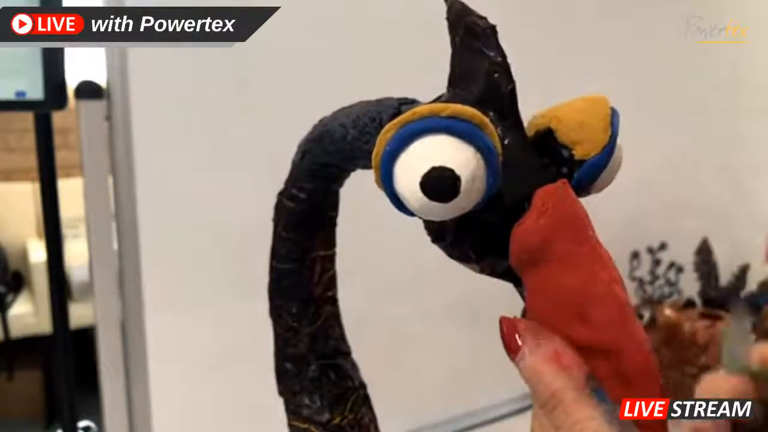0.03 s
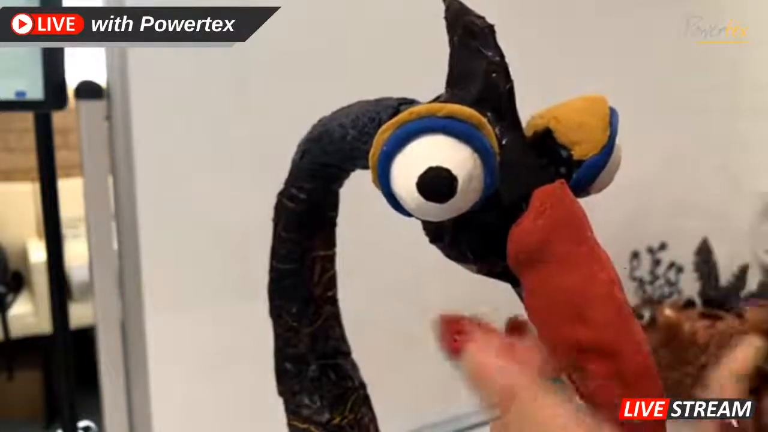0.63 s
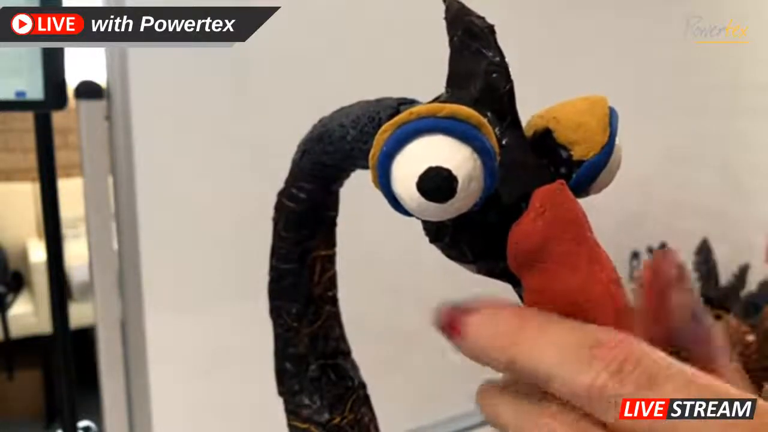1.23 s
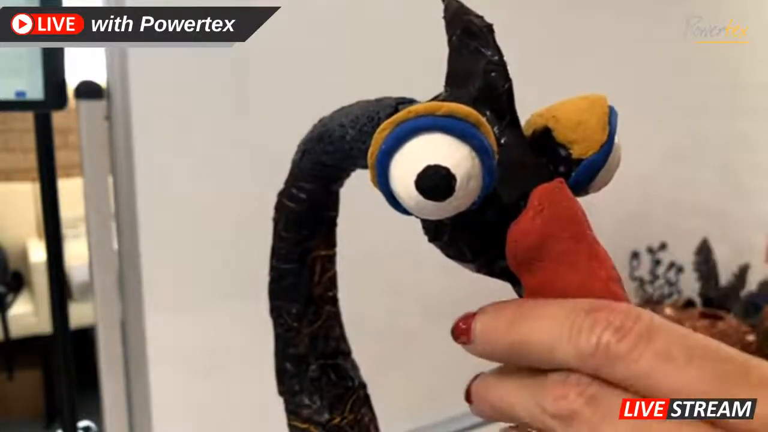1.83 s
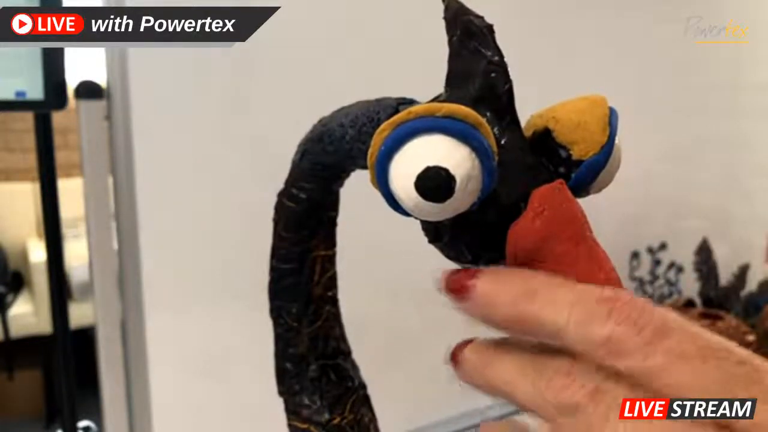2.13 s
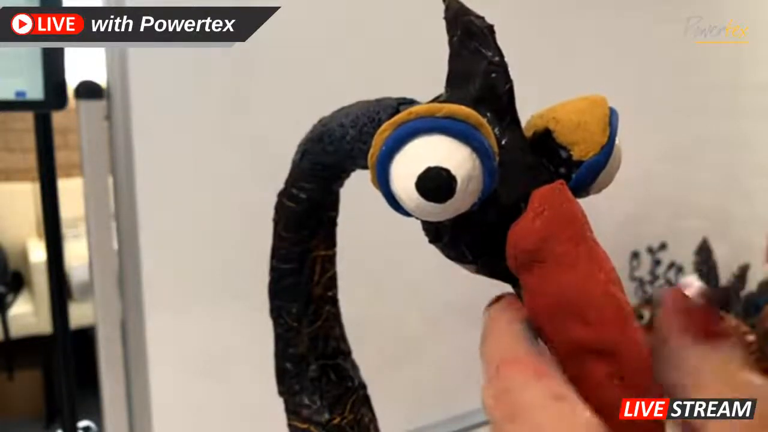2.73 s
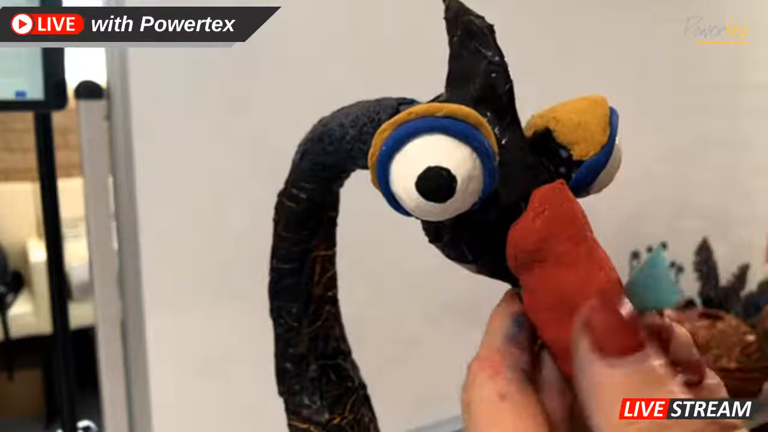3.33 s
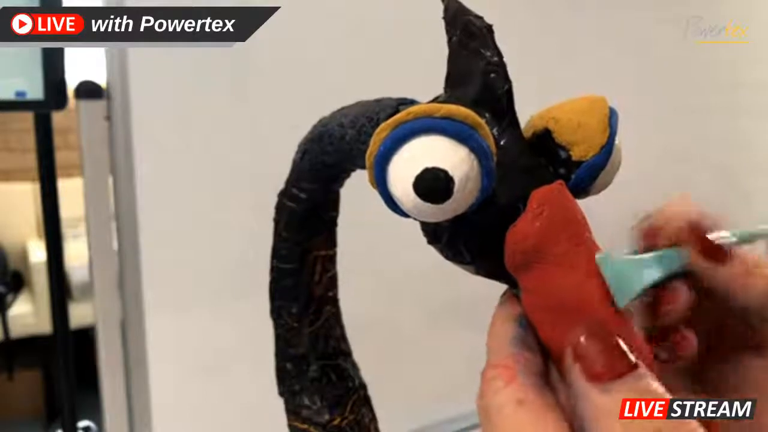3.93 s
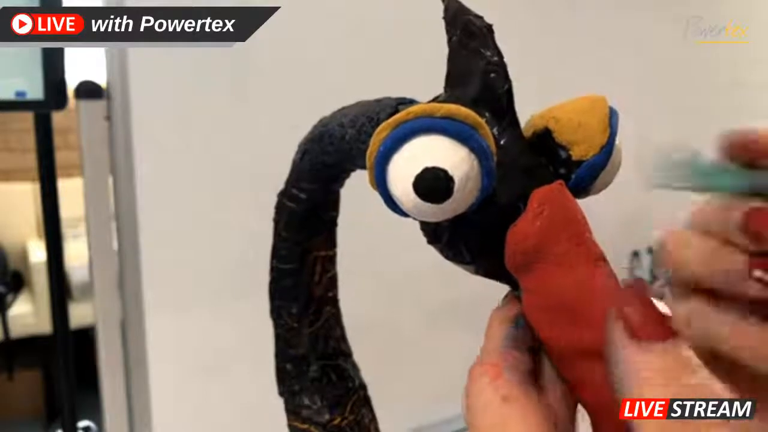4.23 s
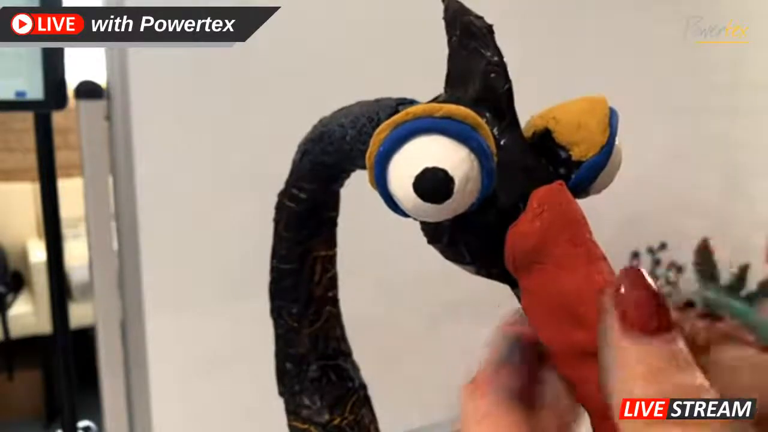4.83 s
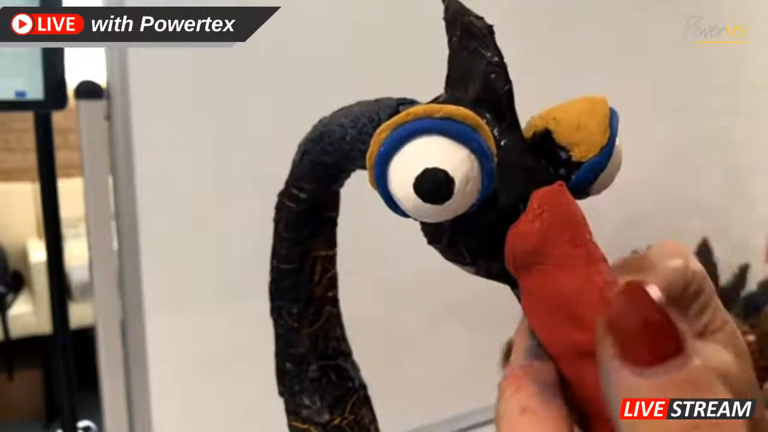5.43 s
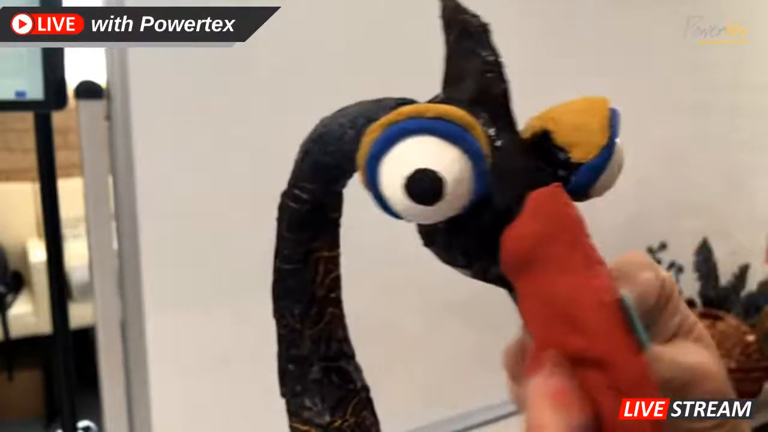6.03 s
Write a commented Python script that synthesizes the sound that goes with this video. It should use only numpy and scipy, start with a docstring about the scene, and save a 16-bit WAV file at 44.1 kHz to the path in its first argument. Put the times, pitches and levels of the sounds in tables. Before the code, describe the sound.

Soft room air and a faint electrical hum run throughout, and the handling sounds are close and fairly dry. A palette knife squeaks twice on clay in the first 0.3 seconds, short and high, the second louder, with tiny fingernail ticks around it. A faint rub and tap follow. At about 1.4 seconds the knife is laid down and bounces with a brief ring. At 1.6 comes the loudest sound, a hard knock that rings briefly in the table top. From 2.0 to 2.6 small tools clatter, scrape and clink. Fingers smooth soft clay in very quiet, hissy strokes from about 2.3 seconds on. A plastic modelling tool clicks sharply at 4.3, and a fingernail snaps on it more lightly at 5.2. A few tiny ticks come near 5.5, then a last soft rub around 6 seconds.

```python
"""Modelling clay in a quiet room

Over room air and a faint mains hum, a palette knife squeaks twice by stick-slip friction, and
fingers smooth soft clay with a grainy hiss. The knife is laid down and bounces, ringing in its modes.
Tools knock, scrape and clink on the work table, setting its top into free vibration, as a plastic
modelling tool is picked out. The rubbing goes on; the tool clicks in the hand and a nail snaps on it."""
import sys
import numpy as np
from scipy import signal
from scipy.fft import rfft, irfft
from scipy.io import wavfile
from scipy.ndimage import uniform_filter1d

SR = 44100
rng = np.random.default_rng(int(sys.argv[2]) if len(sys.argv) > 2 else 0)


def generate_wav(sig):
    """Save sig (samples, or channels by samples) to the path in sys.argv[1] as 16-bit PCM at SR."""
    pcm = np.round(np.clip(np.atleast_2d(sig).T, -1, 1) * 32767).astype(np.int16)
    wavfile.write(sys.argv[1], SR, pcm)


N = 267642


def gain_of(db):
    """Amplitude ratio: a factor of ten for every 20 dB."""
    return 10 ** (np.asarray(db) / 20)

def unit_rms(x):
    """Normalisation to unit mean power."""
    return x / np.sqrt(np.mean(x ** 2) + 1e-30)

def unit_energy(x):
    """Normalisation to the energy of a 5 ms burst of unit rms."""
    return x / np.sqrt(np.sum(x ** 2) / (.005 * SR) + 1e-30)

def curve_at(points, hz):
    """Interpolation along a logarithmic frequency axis."""
    point_hz, value = np.transpose(points)
    return np.interp(np.log(hz + 1), np.log(point_hz + 1), value)

def add(mix, start_s, sound):
    """Superposition: a sound sums into the mix from its start time."""
    part = mix[max(round(start_s * SR), 0):][:len(sound)]
    part += sound[:len(part)]

def rolloff(x, hz, kind, order):
    """A causal, maximally flat low-pass or high-pass filter."""
    return signal.sosfilt(signal.butter(order, min(hz, SR / 2 - 1000), kind, fs=SR, output="sos"), x)

def band(x, low_hz, high_hz, order):
    """Band limiting of an impact, normalised in energy."""
    return unit_energy(rolloff(rolloff(x, low_hz, "high", 4), high_hz, "low", order))

def flutter(shape, samples):
    """Slow random modulation: a moving average of white noise, at unit rms."""
    return unit_rms(uniform_filter1d(rng.standard_normal(shape), size=samples))

def hiss(size, centre_hz, octaves):
    """Band noise: random phases under a bell-shaped spectrum."""
    hz = np.fft.rfftfreq(size, 1 / SR) + 1
    bell = np.exp(-(np.log2(hz / centre_hz) / octaves / 2) ** 2)
    return unit_rms(irfft(bell * np.exp(2j * np.pi * rng.random(len(hz))), size))

def ring(modes, t):
    """Free vibration: one exponentially damped sinusoid for each mode."""
    return sum(gain_of(db - 60 * t / t60) * np.sin(2 * np.pi * (hz * t + rng.random()))
               for hz, db, t60 in modes)

def crack(t, decay_ms, rise_ms=0.54):
    """Impulsive excitation: a dying flurry of tiny impacts with a nearly flat spectrum."""
    envelope = np.exp(-1000 * t / decay_ms) * (1 - np.exp(-1000 * t / rise_ms))
    burst = rng.standard_normal(len(t)) * envelope
    for _ in range(3):  # whiten the spectrum, then confine the burst in time again
        spectrum = rfft(burst)
        whitened = irfft(spectrum / (abs(spectrum) + 1e-12), len(t))
        burst = whitened * np.minimum(1, np.e * envelope / envelope.max())
    return unit_energy(burst)


# spectrum of the room air (frequency [Hz], relative density [dB])
AIR_SPECTRUM = [(12, -52), (20, -19), (70, -21), (101, -12), (168, -12.5), (202, -7), (225, -9.5),
                (344, -11), (414, -12.5), (486, -11), (827, -18.5), (970, -17), (1480, -20), (11500, -25.5),
                (15000, -54.5), (22000, -120)]
# lines of the mains hum (frequency [Hz], rms level [dB])
HUM_LINES = [(99.5, -82.5), (199.6, -74), (265, -84), (349, -83.5)]

def room_noise(air_db=-69, top_hz=11800, fizz_db=-89):
    """A continuous spectrum of air and thin hiss beneath the line spectrum of a wavering hum."""
    hz, t = np.fft.rfftfreq(N, 1 / SR), np.arange(N) / SR
    colour = gain_of(curve_at(AIR_SPECTRUM, hz)) * (hz < top_hz)
    air = unit_rms(irfft(rfft(rng.standard_normal(N)) * colour, N))
    out = gain_of(air_db) * air + gain_of(fizz_db) * rng.standard_normal(N)
    for line_hz, db in HUM_LINES:
        waver = unit_rms(irfft(rfft(rng.standard_normal(N)) * np.exp(-abs(hz - line_hz) / 4), N))
        tone = np.sqrt(2) * np.sin(2 * np.pi * (line_hz * t + rng.random()))
        out += gain_of(db) * (tone + 0.27 * waver)
    return out


# blade squeaks (start [s], length [s], level [dB], settled pitch [Hz], delay to crest [s], strain [0-1])
BLADE_SQUEAKS = [(0.046, 0.033, -53, 1149, 0.0023, 0.09), (.253, .07, -43, 1543, 0.036, .9)]
# radiation response of the blade (frequency [Hz], relative gain [dB])
BLADE_RESPONSE = [(1170, -34), (1550, -7), (2000, 26), (2350, 9.5), (3150, -8.5), (3550, 6.5), (4100, 26),
                  (4700, 1), (5400, 1), (6300, -9), (9000, -33)]

def knife_squeaks(settle_s=.0105, lift_s=.0043, swell_s=.021, burst_s=.01, ramp_s=.0015):
    """Stick-slip oscillation: the blade rasps as it catches, then settles into a harmonic series."""
    out = np.zeros(N)
    for start_s, length, db, settled_hz, crest_s, strain in BLADE_SQUEAKS:
        t = np.arange(0, length, 1 / SR)
        # a strained blade catches sharp, settles, and lifts in pitch as it lets go
        bend = .42 * np.exp(-t / settle_s) + .14 * np.exp((t - length) / lift_s)
        hz = settled_hz * (1 + strain * bend)
        jitter = .0038 + strain * .065 * np.exp(-t / .014)
        cycles = np.cumsum(hz * (1 + jitter * flutter(len(t), 20))) / SR
        # the soft clay damps all but the first three harmonics
        harmonics = np.array([gain_of(curve_at(BLADE_RESPONSE, k * hz) - 16 * (k > 3))
                              for k in range(1, 6)])
        harmonics /= np.linalg.norm(harmonics, axis=0)
        tone = sum(gain * np.sin(2 * np.pi * k * cycles) for k, gain in enumerate(harmonics, 1))
        rasp = strain * gain_of(-8) * np.exp(-t / .019) * hiss(len(t), 5100, 0.13)
        swell = np.exp(-((t - crest_s) / swell_s) ** 2)
        burst = strain * gain_of(-4) * np.exp(-(t / burst_s) ** 2)
        ramps = np.minimum(1, np.minimum(t, length - t) / ramp_s)
        add(out, start_s, gain_of(db) * (unit_rms(tone) + rasp) * (swell + burst) * ramps)
    return out


def ping(db, centre_hz, octaves, decay_ms):
    """A damped resonance of a tiny contact, as band noise with an exponential decay."""
    t = np.arange(SR // 10) / SR
    envelope = np.exp(-1000 * t / decay_ms) * (1 - np.exp(-t / .0002))
    return gain_of(db) * unit_energy(hiss(len(t), centre_hz, octaves) * envelope)

# fingernail contacts (time [s], level [dB])
NAIL_TICKS = [(.185, -69), (.435, -60), (4.3022, -63), (5.483, -68.5), (5.55, -61), (5.563, -65)]

def nail_ticks():
    """Heavy damping: each touch of a nail excites one broad, brief resonance."""
    out = np.zeros(N)
    for start_s, db in NAIL_TICKS:
        add(out, start_s, ping(db, centre_hz=3900, octaves=0.51, decay_ms=2.2))
    return out


def friction(strokes, body_db, grain_db=2.0):
    """Sliding friction: grainy band noise over a low body, swelling and fading with each stroke."""
    out = np.zeros(N)
    for middle_s, length, db, centre_hz, octaves in strokes:
        size = int(length * SR)
        grain = gain_of(grain_db * flutter(size, 200))
        noise = hiss(size, centre_hz, octaves) + gain_of(body_db) * hiss(size, 580, 1.9)
        swell = np.sin(np.linspace(0, np.pi, size))
        add(out, middle_s - length / 2, gain_of(db) * unit_rms(noise * grain) * swell)
    return out

# finger strokes (midpoint [s], length [s], level [dB], centre frequency [Hz])
FINGER_STROKES = [(0.882, 0.46, -68.5, 2120), (1.297, 0.52, -72, 4230), (1.622, 0.079, -61.5, 4600),
                  (2.499, 0.38, -62, 4070), (2.75, .36, -62.5, 4210), (3.017, .29, -66.5, 2560),
                  (3.18, 0.27, -63.5, 4540), (3.72, .17, -72, 3470), (3.925, .18, -69.5, 2800),
                  (4.149, .16, -67, 3300), (4.65, 0.42, -72, 9400), (5.027, .1, -71, 9400),
                  (5.972, 0.21, -69.5, 4700)]

def clay_rubs(octaves=0.33, reference_hz=4060, narrowing=2.06):
    """Friction of skin on clay: a light, bright stroke has a narrow band, a firm, dull one a wide band."""
    strokes = [(middle_s, length, db, hz, octaves * (reference_hz / hz) ** narrowing)
               for middle_s, length, db, hz in FINGER_STROKES]
    return friction(strokes, body_db=-7)


# tools striking the table (time [s], level [dB], weight [0-1], treble edge [Hz], contact decay [ms])
TABLE_KNOCKS = [(0.745, -58.5, 0.45, 1100, 2.8), (1.629, -29.5, .7, 4700, 4.4),
                (1.6322, -20, 0.89, 3740, 6.7), (1.661, -31.5, 0.4, 3640, 2.4),
                (1.854, -49, 0.05, 2370, 9.4), (1.884, -56.5, 0.26, 1460, 6),
                (2.006, -47.5, 0.07, 1670, 5.6), (2.0447, -30, 0.67, 6060, 4.6),
                (2.0762, -35, 0, 4730, 6.3), (2.1137, -38.5, 0, 4800, 5.6), (2.132, -38, 0, 4140, 1.9),
                (2.159, -38.5, 0.3, 2720, 6.6), (2.1897, -30, .1, 2450, 3.9),
                (2.2102, -35, 0.23, 2420, 3.1), (2.389, -34, 0.26, 1540, 2.8),
                (2.416, -39.5, 0.35, 2000, 2.1), (2.424, -33.5, 0.42, 2350, 4),
                (2.482, -50, 0.2, 1900, 3.7), (2.5075, -47.5, 0.05, 2100, 1),
                (2.5418, -37.5, .0, 3260, 4.9)]
# modes of the table top (frequency [Hz], relative level [dB])
TABLE_MODES = [(484.5, -60.5), (952.8, -54.5), (1093, -52), (1136, -52.5), (1292, -54), (1362, -55.5),
               (1410, -57), (1448, -59), (1550, -48), (1857, -50.5), (1965, -70.5), (2073, -52.5),
               (2245, -57), (2342, -52), (2428, -56), (2541, -52), (2697, -64.5), (2912, -59), (2998, -65),
               (3031, -72), (3262, -60), (3365, -62.5), (3515, -47.5), (3628, -61.5)]
# damping across the spectrum (frequency [Hz], share of the ring time [ratio])
RING_TIME_SHARE = [(250, .85), (500, .7), (1000, .95), (2000, 1), (2800, .76), (3600, .64), (4400, .42),
                   (9000, .42)]
# response of the table top to a contact (frequency [Hz], gain [dB])
TABLE_RESPONSE = [(300, 4), (490, -1), (720, -5), (1000, 4.5), (1400, 4.5), (1850, 2), (2200, -7),
                  (2700, -2.5), (3400, 1.5), (4200, -2), (6500, 2)]

def table_knocks(modes_db=-1, sizzle_db=-32, thud_db=-21, grain_db=2.0):
    """Impact and free decay: a short crack, after which the table and its loose tools ring on."""
    out, t = np.zeros(N), np.arange(SR // 2) / SR
    response = gain_of(curve_at(TABLE_RESPONSE, np.fft.rfftfreq(len(t), 1 / SR)))
    for start_s, db, weight, treble_hz, decay_ms in TABLE_KNOCKS:
        # a heavier knock reaches lower and rings longer and louder
        bass_hz = 1010 * (440 / 1010) ** weight
        t60 = 0.14 * (0.47 / 0.14) ** weight
        tail_db = -4 + 2.5 * weight
        # the rattle is grainy noise, each band dying at its own rate
        grain = gain_of(grain_db * flutter(len(t), 100))
        hz, frame_s, spectra = signal.stft(rng.standard_normal(len(t)) * grain, SR, nperseg=256)
        decay = gain_of(-60 * frame_s / (t60 * curve_at(RING_TIME_SHARE, hz)[:, None]))
        rattle = signal.istft(spectra * decay, SR, nperseg=256)[1][:len(t)]
        modes = ring([(f, level, t60 * curve_at(RING_TIME_SHARE, f)) for f, level in TABLE_MODES], t)
        contact = irfft(rfft(crack(t, decay_ms)) * response, len(t)) * (t < t[-1] / 2)
        # a harder contact reaches further into the treble and leaves a faint sizzle above
        head = band(contact, bass_hz, treble_hz, order=8)
        loose_tools = band(rattle, bass_hz, treble_hz, order=10)
        table_top = gain_of(modes_db) * band(modes, bass_hz, treble_hz, order=10)
        tail = gain_of(tail_db) * unit_energy((loose_tools + table_top) * (1 - np.exp(-t / 0.00076)))
        sizzle = band(contact + .6 * unit_energy(rattle), bass_hz, 7587, order=3)
        sizzle *= gain_of(sizzle_db) * treble_hz / 2500
        # heavier blows also give the table a dull push
        thud = band(rolloff(rattle, 223, "high", order=6), 197, 520, order=4)
        thud *= gain_of(thud_db) * min(600 / bass_hz, 1) ** 2
        add(out, start_s, gain_of(db) * (head + tail + sizzle + thud))
    return out


def struck_tool(contacts, modes, crack_db, crack_ms, bass_hz, rise_s, chatter_db=2.5):
    """Modal ringing, made uneven by chatter; softer contacts excite fewer high modes."""
    out, t = np.zeros(N), np.arange(SR // 4) / SR
    for start_s, db, treble_hz in contacts:
        chatter = gain_of(chatter_db * flutter((len(modes), len(t)), 130))
        body = sum(gain * ring([mode], t) for mode, gain in zip(modes, chatter))
        sound = (unit_energy(body) + gain_of(crack_db) * crack(t, crack_ms)) * (1 - np.exp(-t / rise_s))
        add(out, start_s, gain_of(db) * band(sound, bass_hz, treble_hz, order=2))
    return out

# modes of the palette knife (frequency [Hz], relative level [dB], 60 dB decay time [s])
KNIFE_MODES = [(256.7, -16, 0.077), (372, -19, 0.069), (484, -10, 0.073), (533, -4, 0.046),
               (709, -14.5, 0.14), (1160, -18.5, 0.11), (1910, -6, 0.0235), (2286, -17, 0.08),
               (3513, 2.5, 0.03), (3604, 1, 0.081), (3926, -6, 0.029), (5060, -13, 0.044),
               (5930, -2, 0.059), (6385, -15, 0.11), (8920, -11.5, 0.16)]

def knife_drop(drop_s=1.4372, db=-30.5, treble_hz=4600, gap_s=.0485, restitution=.53, loss_db=6.5):
    """Inelastic rebound: each bounce comes sooner, softer and duller; later the knife is nudged."""
    times = [drop_s + gap_s * sum(restitution ** j for j in range(k)) for k in range(4)]
    bounces = [(time_s, db - k * loss_db, treble_hz * .7 ** k) for k, time_s in enumerate(times)]
    nudge = (2.008, -45.5, 5300)  # (time [s], level [dB], treble edge [Hz])
    return struck_tool(bounces + [nudge], KNIFE_MODES,
                       crack_db=-11.5, crack_ms=12, bass_hz=260, rise_s=0.0027)


# dragged tools (midpoint [s], length [s], level [dB], centre frequency [Hz], width [octaves])
TOOL_DRAGS = [(2.019, 0.054, -54, 6200, .94), (2.376, 0.044, -48.5, 2120, 0.66),
              (2.475, .13, -53, 1240, 0.38), (2.568, 0.052, -51, 1650, .25)]

def tool_drags():
    """Friction of tools on the table top gives short scrapes."""
    return friction(TOOL_DRAGS, body_db=-11)


# contacts of the modelling tool (time [s], level [dB], treble edge [Hz])
TOOL_CONTACTS = [(2.030, -42.5, 5500), (4.329, -26, 12300), (4.359, -55.5, 9100)]
# its modes (frequency [Hz], relative level [dB], 60 dB decay time [s])
TOOL_MODES = [(1090, -12.5, 0.039), (1540, -4, 0.012), (2260, -19, 0.035), (3136, -9, 0.049),
              (3650, 4, 0.029), (3900, -4, 0.024), (5700, -9.5, 0.033), (7180, 1, .04), (7250, -17, 0.025),
              (8480, 0, 0.014), (9230, -16, 0.034)]

def tool_clicks():
    """Strongly damped modes: the struck plastic tool gives a short click."""
    return struck_tool(TOOL_CONTACTS, TOOL_MODES, crack_db=-8, crack_ms=5.8, bass_hz=940, rise_s=0.0007)


# tools brushing each other (time [s], level [dB], pitch [Hz])
TOOL_CLINKS = [(2.115, -42.5, 4940), (2.378, -47, 3200), (2.486, -57.5, 9540)]

def tool_clinks():
    """Narrow resonance: tool touching tool gives a thin, pitched clink."""
    out = np.zeros(N)
    for start_s, db, hz in TOOL_CLINKS:
        add(out, start_s, ping(db, hz, octaves=0.033, decay_ms=16))
    return out


# resonances of the snap (relative level [dB], centre frequency [Hz], width [octaves], decay [ms])
SNAP_RESONANCES = [(-1.5, 6780, 0.042, 0.74), (0, 9600, 0.024, 2.1), (-13.5, 3900, 0.51, 3.3),
                   (-5.5, 6000, 0.21, 5.4)]

def nail_snap(start_s=5.1678, db=-39):
    """Impulse response: one snap of a nail on the tool excites several resonances at once."""
    out = np.zeros(N)
    add(out, start_s, gain_of(db) * sum(ping(*resonance) for resonance in SNAP_RESONANCES))
    return out


def room(x, wet_db=-20, t60=0.17, echoes_per_s=2000):
    """Reverberation: faint reflections from the nearby board and walls follow the direct sound."""
    t = np.arange(SR // 3) / SR
    echoes = rng.standard_normal(len(t)) * (rng.random(len(t)) < echoes_per_s / SR)
    echoes *= (t > .004) * gain_of(-60 * t / t60)
    return x + gain_of(wet_db) * signal.fftconvolve(x, echoes / np.linalg.norm(echoes))[:N]

def scene():
    """Superposition of the handling sounds, their top treble softened, and the steady room noise."""
    tools = knife_drop() + tool_clicks() + tool_drags() + knife_squeaks() + table_knocks()
    small_sounds = nail_ticks() + tool_clinks() + nail_snap() + clay_rubs()
    handling = rolloff(tools + small_sounds, 8800, "low", order=4)
    return (room(handling) + room_noise())[None]

def record(dry, cutoff_hz=15800):
    """Band limiting by a steep linear-phase low-pass filter."""
    lowpass = signal.firwin(511, cutoff_hz, window=("kaiser", 9), fs=SR)
    return signal.oaconvolve(dry, lowpass[None], "same")


dry = scene()
out = record(dry)
generate_wav(out)
```